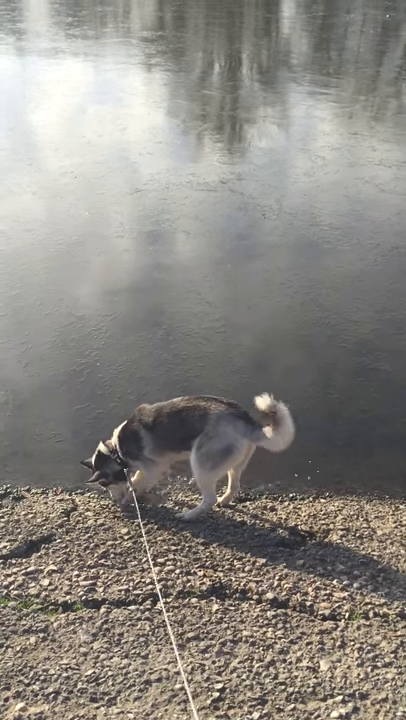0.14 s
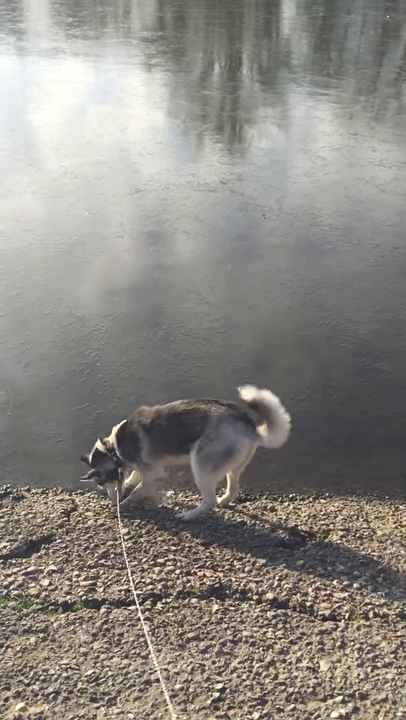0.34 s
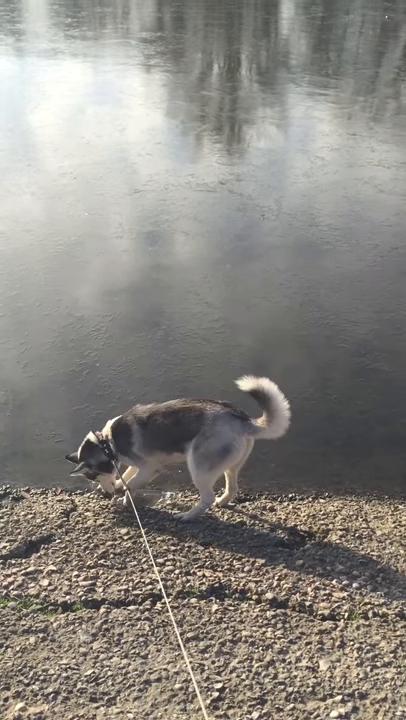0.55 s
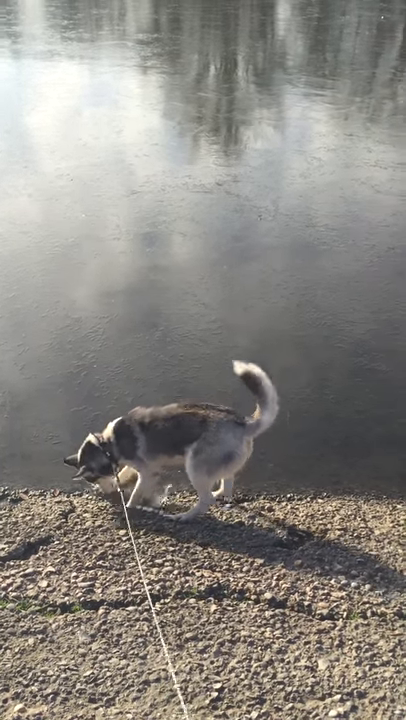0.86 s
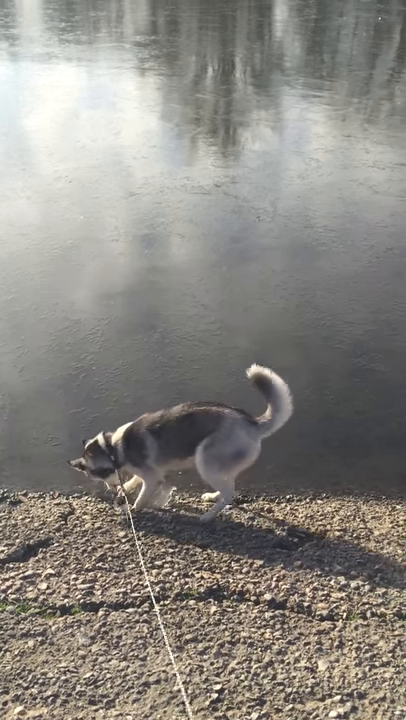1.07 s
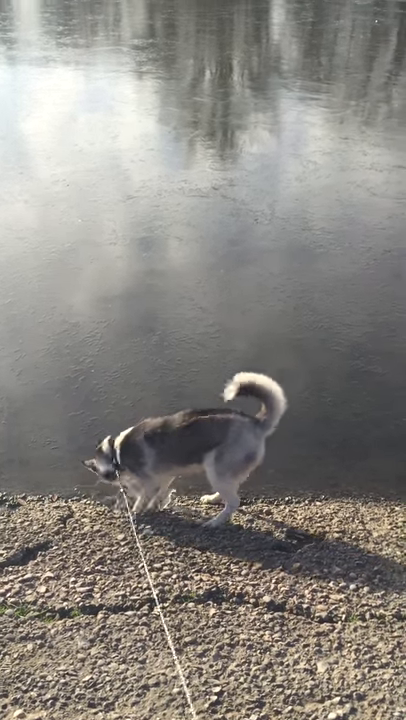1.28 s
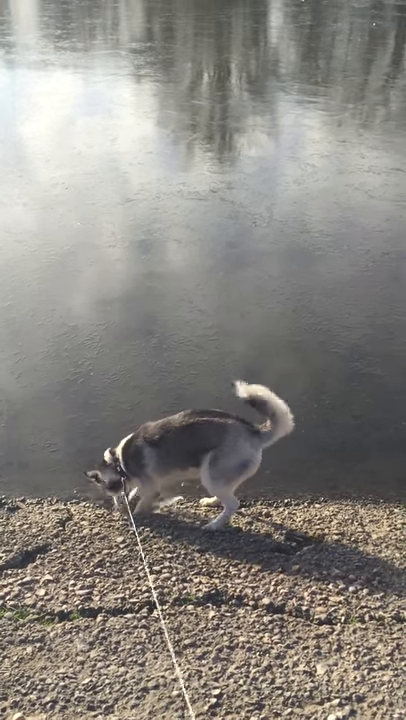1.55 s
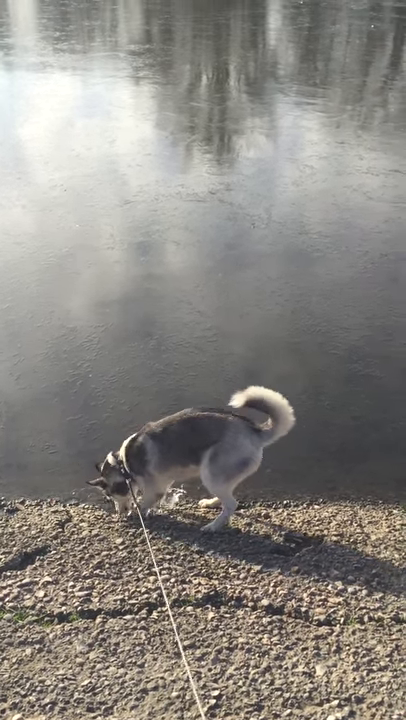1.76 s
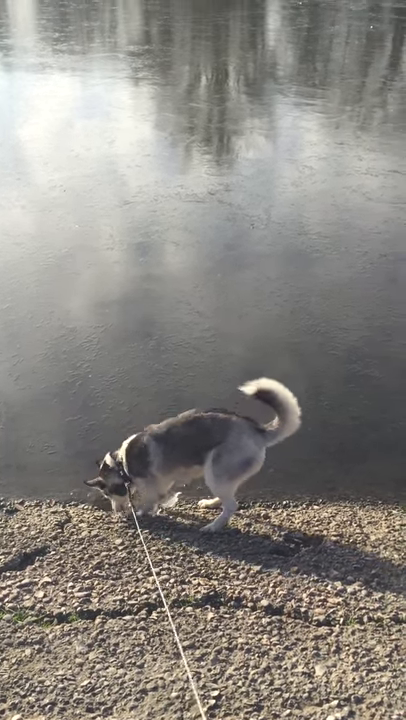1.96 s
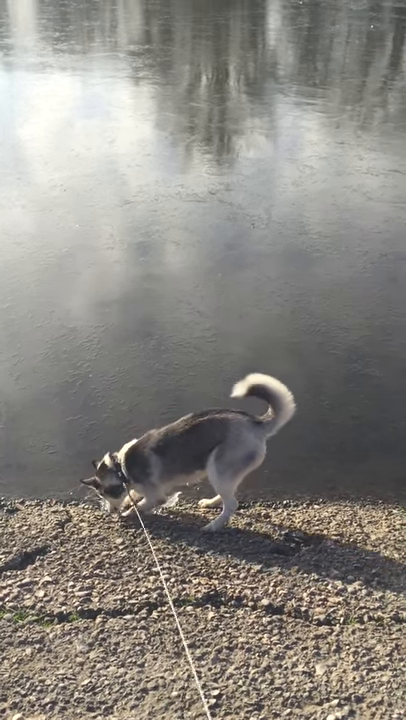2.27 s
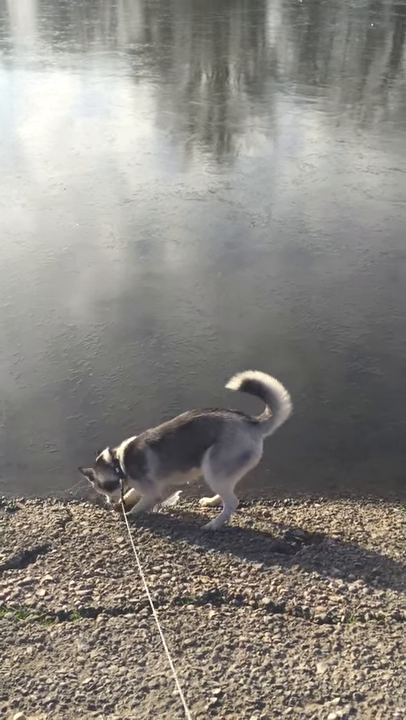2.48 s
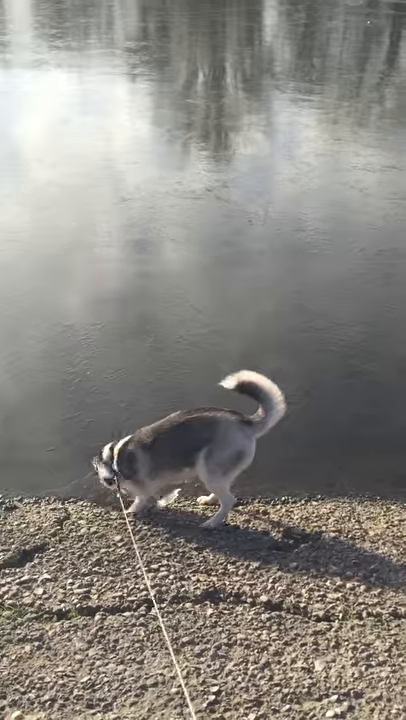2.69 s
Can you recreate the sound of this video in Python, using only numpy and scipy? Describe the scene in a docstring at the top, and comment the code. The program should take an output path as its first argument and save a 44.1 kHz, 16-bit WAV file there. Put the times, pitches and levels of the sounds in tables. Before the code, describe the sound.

Thin ice crackles, clicks and snaps under a dog's pawing claws, with slushy scrapes and tiny glassy rings; a sharp crack near one second, a drag and harder crack near 1.5, sparser later; outdoors, close microphone, low rumble.

```python
"""At a pond's edge outdoors, a dog paws thin ice a few metres from a small microphone.
The ice snaps in short coloured noise bursts, and shards and air pockets ring as brief gliding sines.
Claws scrape and slush crackles as dense clicks exciting resonances; one long drag is a stick-slip train.
A larger plate, knocked once, sounds its modes; paws land with low thumps.
Filtered noise makes the low rumble, a distant hum and the outdoor hiss that lie under it all."""
import sys
import numpy as np
from scipy import signal
from scipy.fft import rfft, irfft, next_fast_len
from scipy.io import wavfile

SR = 44100
rng = np.random.default_rng(int(sys.argv[2]) if len(sys.argv) > 2 else 0)


def unload_audio(sound):
    """Save the sound as a 16-bit wav file, at the path given as the first command line argument."""
    columns = np.transpose(np.atleast_2d(sound))
    # keep every value between -1 and 1, then stretch to whole-number steps
    steps = np.round(np.clip(columns, -1, 1) * 32767)
    wavfile.write(sys.argv[1], SR, steps.astype(np.int16))


N = 124803
TOP_HZ = 0.45 * SR       # upper edge of the widest noise bands
FADE_S = 0.0096          # fade at either end of a scrape or drag
ROUGHNESS_DB = 2.2       # spread of the level flutter on rings and plate modes


def from_db(db):
    """A level in decibels is 20 log10 of the amplitude ratio returned here."""
    return 10 ** (np.asarray(db) / 20)


def rms_one(x):
    """Dividing by the root mean square gives a signal unit effective amplitude."""
    return x / np.sqrt(np.mean(x ** 2) + 1e-20)


def band(x, low_hz, high_hz):
    """A Butterworth band-pass has a maximally flat response between its edges."""
    return signal.sosfilt(signal.butter(2, [low_hz, high_hz], "band", fs=SR, output="sos"), x)


def dull(x):
    """A first-order low-pass rolls the treble off gently, at 6 dB an octave."""
    return signal.lfilter(*signal.butter(1, 7900, fs=SR), x)


def double_pole(x, r):
    """Two equal real poles turn an impulse into a swell that dies away."""
    return signal.lfilter([1], [1, -2 * r, r * r], x)


def drift(rate_hz):
    """Noise through two equal low-pass poles is a slow random fluctuation, here of spread 1."""
    step = 20   # samples between computed points
    r = np.exp(-2 * np.pi * rate_hz * step / SR)
    slow = double_pole(rng.standard_normal(N // step + 2002), r)[2000:]   # start-up left out
    return np.interp(np.arange(N) / step, np.arange(len(slow)), rms_one(slow))


def add(out, start_s, x):
    """Superposition: the pressures of separate sources add."""
    i = max(int(start_s * SR), 0)
    out[i:i + len(x)] += x[:max(N - i, 0)]


def shape(attack_s, t60_s):
    """A struck body's envelope rises quickly, then loses 60 dB by t60."""
    t = np.arange(int(0.12 * SR)) / SR
    rise = (1 - np.exp(-t / attack_s)) ** 2
    decay = from_db(-60 * (t / t60_s) ** 1.2)   # exponent over 1: the decay speeds up towards its end
    env = rise * decay
    return t, env / env.max()


def coloured(spectrum):
    """Spectral shaping: white noise weighted at each frequency takes on the given spectrum, at rms 1."""
    hz, db = np.transpose(spectrum)
    size = next_fast_len(N)
    f = np.maximum(np.arange(size // 2 + 1) * SR / size, 1)
    weight = from_db(np.interp(np.log(f), np.log(hz), db))
    return rms_one(irfft(rfft(rng.standard_normal(size)) * weight, size)[:N])


def hum():
    """Narrow-band noise is heard as a wavering tone: a distant hum."""
    centre_hz, width_hz = 111.1, 14.8
    tone = band(rng.standard_normal(N), centre_hz - width_hz / 2, centre_hz + width_hz / 2)
    return from_db(-53.5) * rms_one(tone)


def air():
    """Broadband noise with a falling spectrum is heard as outdoor hiss, its level fluttering slightly."""
    # hiss spectrum before the band-pass: frequency_hz, density_db (per Hz, relative)
    hiss_spectrum = [(750, -19), (1150, -21.5), (1500, -34), (2200, -38), (4000, -42), (9000, -49),
                     (15500, -46.5)]
    hiss = rms_one(band(coloured(hiss_spectrum), 340, TOP_HZ))
    return from_db(-59 + 1.3 * drift(26)) * hiss


def rumble():
    """Low-passed noise makes low wind and distant rumble; each octave is modulated independently."""
    # rumble spectrum before filtering and surges: frequency_hz, density_db (per Hz, relative)
    rumble_spectrum = [(20, -28), (48, 2), (70, 5), (112, 0), (155, -1.5), (200, -1.5), (260, -6.5),
                       (354, -9.5), (440, -29), (610, -18.5), (780, -23), (1320, -120)]
    # course of the rumble: time_s, level_db
    rumble_level = [(0.0, -44.5), (0.46, -43), (0.98, -45.5), (1.48, -42), (1.95, -44), (2.03, -42),
                    (2.83, -42)]
    low = signal.sosfilt(signal.butter(2, 700, fs=SR, output="sos"), coloured(rumble_spectrum))
    surging = np.zeros(N)
    for hz in 22 * 2.0 ** np.arange(6):
        surge = from_db(1.2 * drift(3.0))
        surging += surge * band(low, hz, hz * 2)
    s, db = np.transpose(rumble_level)
    return from_db(np.interp(np.arange(N) / SR, s, db)) * rms_one(surging)


def ringing_grains(clicks, centre_hz):
    """Resonance: each click rings one of 24 damped modes, loudest near the moving centre frequency."""
    modes = 24
    dealt, body = rng.integers(0, modes, N), np.zeros(N)
    for k, hz in enumerate(np.geomspace(700, 7000, modes)):
        # the peak spreads 0.61 octave; far modes keep a floor of -8 dB
        near = np.exp(-0.5 * (np.log2(hz / centre_hz) / 0.61) ** 2) + from_db(-8)
        r = from_db(-60 * hz / (40 * SR))   # 60 dB lost in 40 cycles
        w = 2 * np.pi * hz / SR
        struck = clicks * (dealt == k) * near + 1e-18
        ringing = signal.lfilter([0, np.sin(w)], [1, -2 * r * np.cos(w), r * r], struck)
        body += (hz / 2000) ** 0.36 * band(ringing, hz / 1.316, hz * 1.286)
    return body


def scrapes():
    """Granular friction: claws and slush make dense random clicks that excite resonances and a treble fizz."""
    # one sub-table a stroke, levels before a small trim: time_s, level_db, treble_level_db, resonance_hz
    strokes = [
        [(0.0, -43, -37.5, 2330), (0.024, -43.5, -70, 2900), (0.056, -48.5, -36, 1880), (0.084, -46, -50, 1820),
         (0.13, -71, -67, 2240)],
        [(0.27, -73, -70, 2400), (0.312, -49.5, -95, 2390), (0.352, -56.5, -85, 1450),
         (0.422, -49.5, -69, 1390), (0.5, -65, -92, 1570)],
        [(0.6, -86, -95, 1590), (0.628, -55.5, -87, 1350), (0.708, -40.5, -54, 1320), (0.786, -55.5, -68, 2130),
         (0.8, -98, -79, 2130)],
        [(0.8, -56, -64, 1510), (0.828, -47, -68, 1550), (0.854, -64, -70, 1870), (0.9, -56, -55, 2040)],
        [(0.921, -39, -41, 2630), (0.933, -33.5, -36, 2600), (0.98, -47.5, -75, 1660)],
        [(0.98, -80, -52, 2170), (0.996, -40, -57, 2120), (1.04, -53.5, -61.5, 1660), (1.1, -41.5, -59, 2030),
         (1.224, -49.5, -63, 1900), (1.24, -91, -80, 1840)],
        [(1.27, -81, -79, 1800), (1.298, -60, -72, 1680), (1.36, -45.5, -49, 1890)],
        [(1.465, -27.5, -41, 1770), (1.51, -55, -67, 1750)],
        [(1.533, -47, -79, 2210), (1.565, -43.5, -65, 2250), (1.631, -51.5, -72, 1520), (1.66, -67, -85, 2650)],
        [(1.7, -57, -66, 2300), (1.72, -55, -59, 2330), (1.742, -54, -53, 1600), (1.78, -45, -63, 1650),
         (1.816, -34, -43.5, 2060), (1.87, -61, -84, 1770)],
        [(1.87, -46.5, -68, 1330), (1.934, -52.5, -93, 1900), (1.966, -61.5, -65, 1420), (2.06, -59, -78, 1620)],
        [(2.1, -78, -91, 1860), (2.12, -64, -100, 2250), (2.156, -48, -85, 1680), (2.186, -64, -64, 1840),
         (2.224, -53.5, -95, 1510), (2.3, -65, -78, 1550)],
        [(2.36, -71, -90, 2370), (2.406, -75, -75, 2180), (2.428, -59, -69, 1380), (2.448, -49.5, -104, 1370),
         (2.5, -78, -63.5, 1360)],
        [(2.62, -82, -71, 2070), (2.656, -67, -78, 2180), (2.694, -60, -65, 1570), (2.732, -44, -65, 2060),
         (2.756, -43.5, -59, 2500), (2.83, -40.5, -72, 1920)],
    ]
    t = np.arange(N) / SR
    # the slush never falls quite silent
    level, treble = np.full(N, from_db(-68.5)), np.full(N, from_db(-75.5))
    centre_hz = np.full(N, 2000.0)
    for rows in strokes:
        s, db, treble_db, hz = np.transpose(rows)
        on = np.clip(np.minimum(t - s[0], s[-1] - t) / FADE_S + 1, 0, 1)
        level += on * from_db(np.interp(t, s, db))
        treble += on * from_db(np.interp(t, s, treble_db))
        centre_hz[on > 0] = np.interp(t, s, hz)[on > 0]

    grains_per_s, grain_spread_db = 4500, 3.7
    present = rng.random(N) < grains_per_s / SR
    size = from_db(grain_spread_db * np.minimum(rng.exponential(1, N), 4))
    clicks = present * size * rng.choice([-1, 1], N)

    body = rms_one(band(ringing_grains(clicks, centre_hz), 420, 12000))
    fizz = rms_one(dull(band(clicks + 0.54 * rng.standard_normal(N), 3800, TOP_HZ)))
    patchy = from_db(1 * drift(90))
    return patchy * (from_db(-1.0) * level * body + from_db(-1.5) * treble * fizz)


def slips():
    """Stick-slip: jerks at uneven gaps and of uneven size, each a quick swell that dies away."""
    slips_per_s, slip_s, floor = 450, 0.0008, 0.35
    at = np.cumsum(rng.uniform(0.4, 1.6, N // 20) * SR / slips_per_s).astype(int)
    size = from_db(4 * rng.standard_normal(N // 20))
    jerks = np.zeros(N)
    jerks[at[at < N]] = size[at < N]
    return floor + rms_one(double_pole(jerks, np.exp(-2 / (slip_s * SR))))


def drag():
    """Stick-slip friction: one long drag of the claws jolts ice resonances that slide down together."""
    # course of the drag: time_s, level_db, treble_level_db, main_resonance_hz
    course = [(1.352, -47, -53, 2567), (1.364, -49, -51, 2510), (1.378, -29.5, -47, 2554),
              (1.436, -28.5, -41.5, 2234), (1.454, -28.5, -38, 2140), (1.461, -22.5, -20, 2000)]
    # resonances: ratio_to_main_resonance, width_hz, level_db (relative)
    resonances = [(.62, 300, -3), (1.0, 350, 6), (1.551, 395, -1.5), (2.498, 505, -11.5)]
    s, db, treble_db, hz = np.transpose(course)
    t = np.arange(int((s[-1] - s[0]) * SR)) / SR + s[0]
    n = len(t)
    grit = slips()[:n]
    phase = 2 * np.pi * np.cumsum(np.interp(t, s, hz)) / SR
    body = np.zeros(n)
    for ratio, width_hz, tone_db in resonances:
        # a random phase widens the sine into a band
        low_pass = signal.butter(1, width_hz / 2, fs=SR, output="sos")
        a, b = signal.sosfilt(low_pass, rng.standard_normal((2, n)))
        tone = rms_one(np.cos(ratio * phase + np.arctan2(a, b)))
        # half shared jerks, half its own
        body += from_db(tone_db) * np.sqrt(grit * slips()[:n]) * tone
    body = rms_one(band(body, 670, 12600))
    hiss = rms_one(dull(band(rng.standard_normal(n) * grit, 4400, 19000)))
    fade = np.clip(np.minimum(t - s[0], s[-1] - t) / FADE_S, 0, 1)
    level, treble = from_db(np.interp(t, s, db)), from_db(np.interp(t, s, treble_db))
    out = np.zeros(N)
    add(out, s[0], fade * (level * body + treble * hiss))
    return out


def knock():
    """Modal vibration: a larger knocked plate sounds damped modes together, roughened by loose slush."""
    # modes of the plate: frequency_hz, level_db (relative), t60_s
    plate_modes = [(331, -12.5, 0.068), (688, -0.5, 0.095), (930, -7.5, 0.12), (1550, -7, 0.024),
                   (3640, -19, 0.05), (5900, -12, 0.042)]
    start_s, level_db, attack_s = 0.681, -27.5, 0.0026
    out = np.zeros(N)
    for hz, db, t60_s in plate_modes:
        t, env = shape(attack_s, t60_s)
        add(out, start_s, from_db(level_db + db) * env * np.sin(2 * np.pi * hz * t))
    return out * from_db(ROUGHNESS_DB * drift(150))


def rings():
    """Damped free vibration: shards and air pockets ring as dying, slightly rough sines whose pitch slides."""
    # rings, levels relative: start_s, level_db, start_pitch_hz, t60_s, pitch_rise_octaves_per_s
    ring_table = [(0.062, -33, 1255, 0.04, 5), (0.068, -20, 1410, 0.0084, 4.3),
                  (0.3874, -21.5, 1247, 0.05, 4), (0.4615, -37.5, 1506, 0.028, 3.0),
                  (0.6758, -25, 1260, 0.057, 4.5), (0.8555, -29, 1875, 0.041, 4),
                  (1.003, -35, 1136, 0.032, 2.0), (1.04, -29, 1167, 0.032, 3),
                  (1.0709, -26.5, 1970, 0.015, -7), (1.1171, -19.5, 1950, 0.0094, 15),
                  (1.196, -29.5, 1193, 0.02, -5), (1.3036, -31, 1520, 0.043, 5),
                  (1.329, -35.5, 1550, 0.18, -0.8), (1.4615, -11, 1786, 0.0078, 4),
                  (1.4752, -16.5, 1714, 0.016, 0), (1.5788, -28.5, 1870, 0.02, 5),
                  (1.6085, -34.5, 1290, 0.043, 6), (1.7788, -23, 1396, 0.027, 5),
                  (1.8092, -29.5, 1780, 0.064, 4), (1.83, -24.5, 1794, 0.044, 3.5),
                  (1.8891, -26, 1000, 0.011, 2), (1.9765, -30.5, 1090, 0.023, 6),
                  (1.9878, -35.5, 1560, 0.035, 4), (2.0164, -43, 1500, 0.025, 7),
                  (2.1101, -41.5, 1170, 0.029, 2.7), (2.1864, -38, 2040, 0.017, 5),
                  (2.2049, -38, 1480, 0.029, 3.0), (2.4425, -34, 1240, 0.016, -7),
                  (2.8075, -24, 2050, 0.027, -2), (0.017, -39, 3630, 0.055, 2),
                  (0.2905, -39.5, 2510, 0.033, 1), (0.9163, -24, 3560, 0.044, 11),
                  (1.093, -32, 3490, 0.033, 9), (1.1248, -37.5, 3440, 0.031, 6),
                  (1.645, -42, 3500, 0.02, 1.2), (1.568, -48, 3930, 0.053, -1.5),
                  (2.0634, -42.5, 2630, 0.017, 2.2), (2.1331, -38.5, 2710, 0.016, 5),
                  (2.3785, -45.5, 2600, 0.023, 9), (2.725, -43, 3300, 0.015, 1.2),
                  (2.74, -36, 3270, 0.018, -2), (2.7656, -31, 2250, 0.02, 9),
                  (2.7773, -28.5, 2650, 0.042, 2.5), (1.104, -33, 815, 0.018, 6),
                  (1.53, -30, 540, 0.075, 11.5), (1.836, -25.5, 760, 0.014, 3.6),
                  (1.868, -35.5, 557, 0.05, 0), (2.221, -39, 468, 0.072, 6), (2.247, -33, 697, 0.032, 3.0),
                  (0.7064, -39, 6560, 0.03, 0), (0.7382, -39.5, 6040, 0.018, 9),
                  (1.0405, -44, 5640, 0.032, 1.5), (1.58, -45.5, 5370, 0.035, 2),
                  (1.9589, -61, 4460, 0.025, 4), (2.8075, -38.5, 5100, 0.022, -1),
                  (.809, -30, 1700, 0.067, -19.5), (1.28, -44.5, 2530, 0.11, 6),
                  (1.297, -37.5, 3740, 0.063, -0.5), (1.5305, -28.5, 2174, 0.042, 3.5)]
    out = np.zeros(N)
    for start_s, db, hz, t60_s, rise in ring_table:
        t, env = shape(0.00038, t60_s)
        phase = 2 * np.pi * np.cumsum(hz * 2 ** (rise * t)) / SR
        add(out, start_s, from_db(db - 3.5) * env * np.sin(phase))
    return out * from_db(ROUGHNESS_DB * drift(510))


def burst(noise, start_s, db, env):
    """Random spectral peaks and dips colour a noise burst, which keeps the energy of its envelope."""
    colour_db, colour_step_hz = 7.5, 687
    f = np.arange(len(env) // 2 + 1) * SR / len(env)
    colour = from_db(colour_db * np.interp(f / colour_step_hz, np.arange(80), rng.standard_normal(80)))
    excerpt = noise[int(start_s * SR):][:len(env)]
    piece = env * irfft(rfft(excerpt) * colour, len(env))
    return from_db(db) * piece * np.sqrt(np.sum(env ** 2) / np.sum(piece ** 2))


def snaps():
    """Impulsive fracture: ice snaps are sharp noise bursts whose treble dies faster; paws add low thumps."""
    # snaps, levels relative: start_s, level_db, treble_db (against level_db), middle_t60_s, rise_s
    snap_table = [(0.016, -27.5, -11.5, 0.023, 0.0009), (0.057, -26, -3, 0.011, 0.00037),
                  (0.067, -26, -17, 0.074, 0.00044), (0.099, -42.5, 0.5, 0.022, 0.001),
                  (0.1538, -38.5, -8.5, 0.025, 0.00042), (0.2072, -44, -8.5, 0.025, 0.001),
                  (0.289, -41.5, -23, 0.083, 0.0012), (0.3586, -38, -19, 0.12, 0.00043),
                  (0.4073, -31.5, -4, 0.015, 0.00047), (0.4844, -40, -7, 0.01, 0.00091),
                  (0.605, -42.5, -18, 0.013, 0.00085), (0.673, -26.5, -20, 0.054, 0.0013),
                  (0.6843, -25.5, -13, 0.031, 0.0013), (0.7163, -47, 4, 0.018, 0.00091),
                  (0.7662, -32, -14, 0.017, 0.00051), (0.8092, -36.5, -5, 0.023, 0.00086),
                  (0.851, -35, -7, 0.03, 0.00072), (0.8673, -32.5, -17, 0.024, 0.001),
                  (0.9169, -9.5, -7.5, 0.0045, 0.00039), (0.939, -26.5, -9, 0.025, 0.0011),
                  (0.9965, -30.5, -1.5, 0.017, 0.0008), (1.001, -28.5, -7, 0.031, 0.001),
                  (1.029, -35, -7, 0.03, 0.001), (1.0396, -26.5, -8, 0.022, 0.00075),
                  (1.07, -26, 1.5, 0.011, 0.00061), (1.085, -39, -12, 0.0087, 0.0005),
                  (1.094, -36, -10, 0.02, 0.001), (1.1034, -27, -13, 0.021, 0.00071),
                  (1.1146, -28.5, -26, 0.029, 0.00083), (1.1944, -24.5, -7.5, 0.022, 0.00048),
                  (1.2179, -39.5, 5, 0.0077, 0.00065), (1.281, -44, -27, 0.057, 0.00085),
                  (1.297, -31, -18, 0.044, 0.00037), (1.329, -29, -23, 0.077, 0.0022),
                  (1.3605, -24.5, -30, 0.12, 0.0011), (1.4426, -24, -1.5, 0.012, 0.00027),
                  (1.4606, -18.5, -4.5, 0.021, 0.0007), (1.4752, -24, -23, 0.016, 0.001),
                  (1.5265, -34.5, -22, 0.028, 0.0013), (1.548, -30.5, -13.5, 0.019, 0.0012),
                  (1.5539, -21, -6.5, 0.025, 0.00068), (1.5673, -32, -9, 0.019, 0.00087),
                  (1.5786, -26, -16, 0.01, 0.00025), (1.6424, -37.5, -16.5, 0.032, 0.0012),
                  (1.716, -51.5, 14.5, 0.045, 0.00064), (1.7236, -36, 4, 0.007, 0.00046),
                  (1.7441, -36, 0.5, 0.022, 0.00084), (1.7764, -24, -6.5, 0.014, 0.00078),
                  (1.7829, -25.5, -4.5, 0.068, 0.00066), (1.808, -34, -22, 0.06, 0.001),
                  (1.884, -54, -24, 0.016, 0.00083), (1.8925, -34, -16, 0.017, 0.00049),
                  (1.9025, -39, -25, 0.0089, 0.0005), (1.92, -44, -17, 0.0092, 0.0008),
                  (1.958, -41.5, -23, 0.022, 0.00091), (1.9757, -33.5, -9.5, 0.018, 0.00059),
                  (2.045, -49.5, -9, 0.011, 0.0006), (2.085, -53, -9, 0.012, 0.0006),
                  (2.112, -42, -22, 0.018, 0.0006), (2.1336, -47.5, -2, 0.02, 0.0007),
                  (2.147, -51, -13, 0.029, 0.0023), (2.404, -33.5, -5, 0.02, 0.00061),
                  (2.419, -39.5, -12, 0.023, 0.00066), (2.703, -51, 3.5, 0.014, 0.0011),
                  (2.7647, -32, -19.5, 0.11, 0.0014), (2.7933, -30.5, -25, 0.015, 0.0004),
                  (2.806, -37, -14, 0.015, 0.001), (2.8244, -42, -4.5, 0.054, 0.0016),
                  (0.3862, -23, -12, 0.026, 0.0028), (2.239, -39, -9, 0.036, 0.0038),
                  (2.396, -40, 0.5, .04, 0.0013)]
    # landings of a paw: start_s, peak_db
    landings = [(0.391, -32.5), (0.914, -34.5), (1.462, -25)]
    split_hz = 5120
    out, white = np.zeros(N), rng.standard_normal(N + SR)
    middle = band(white, 1500, split_hz)
    treble = dull(band(white, split_hz, TOP_HZ))
    for start_s, db, treble_db, t60_s, rise_s in snap_table:
        middle_env = shape(rise_s, t60_s)[1]
        treble_env = shape(rise_s, 0.5 * t60_s)[1]
        add(out, start_s, burst(middle, start_s, db - 7, middle_env))
        add(out, start_s, burst(treble, start_s, db + treble_db - 0.5, treble_env))
    thump = band(shape(0.00021, 0.0037)[1], 170, 800)
    for start_s, db in landings:
        add(out, start_s, from_db(db) * thump / np.abs(thump).max())
    return out


def scene():
    """Superposition of all sources in one channel."""
    background = hum() + air() + rumble()
    ice = scrapes() + drag() + knock() + rings() + snaps()
    return (background + ice)[None]


def record(dry):
    """Band limiting: a steep Chebyshev low-pass cuts the top, 60 dB down from 16640 Hz."""
    return signal.sosfilt(signal.cheby2(12, 60, 16640, fs=SR, output="sos"), dry)


dry = scene()
out = record(dry)
unload_audio(out)
```